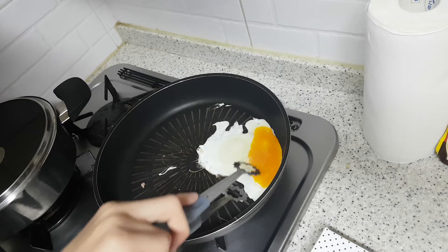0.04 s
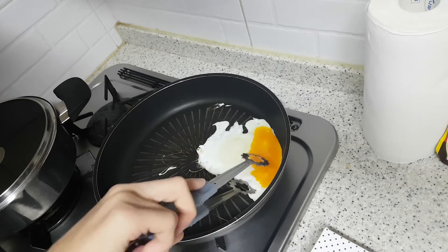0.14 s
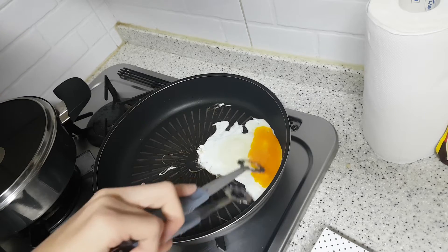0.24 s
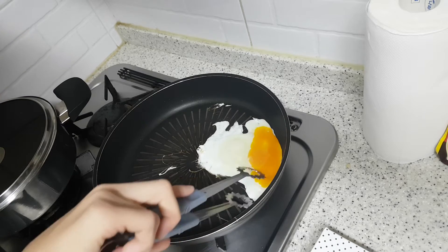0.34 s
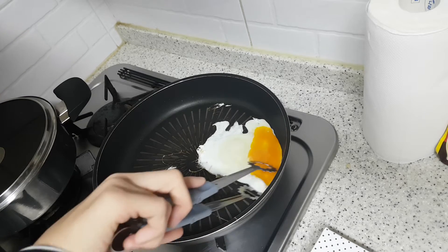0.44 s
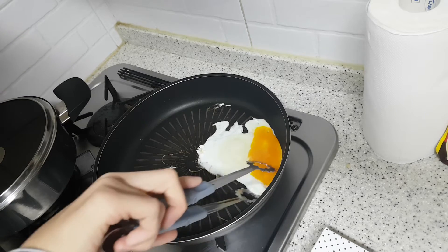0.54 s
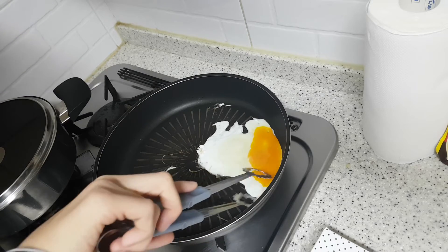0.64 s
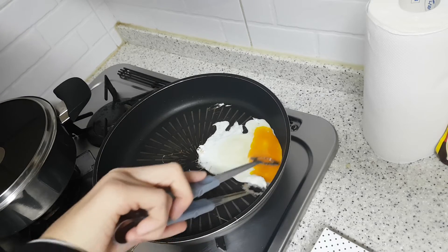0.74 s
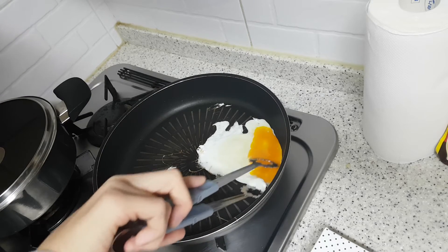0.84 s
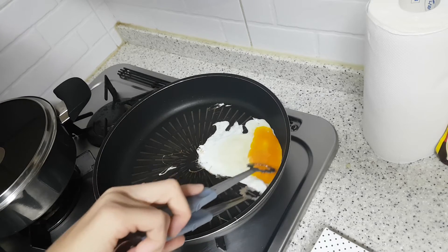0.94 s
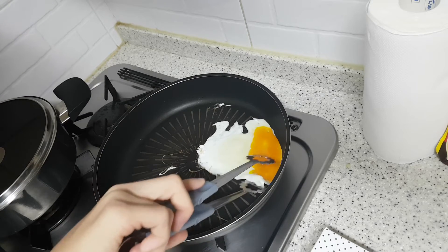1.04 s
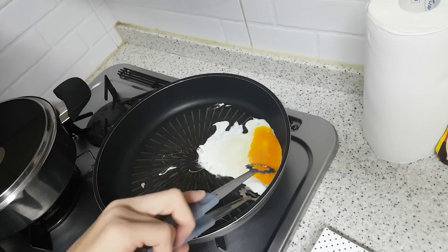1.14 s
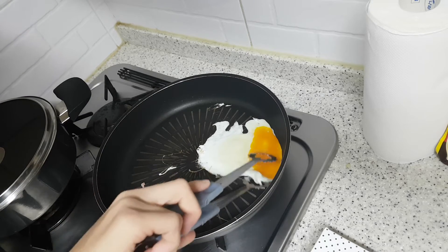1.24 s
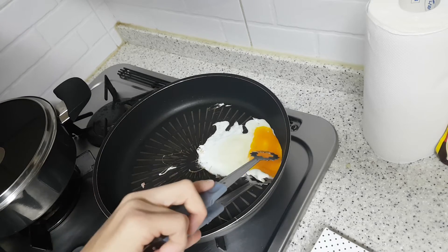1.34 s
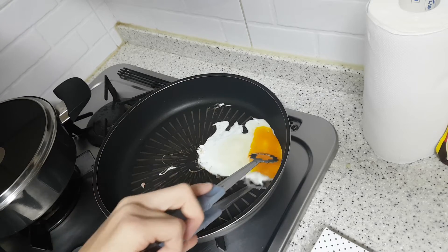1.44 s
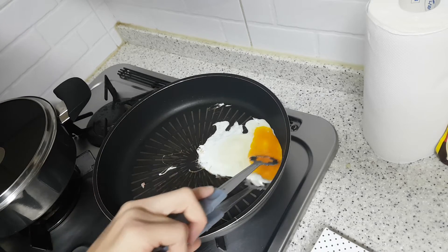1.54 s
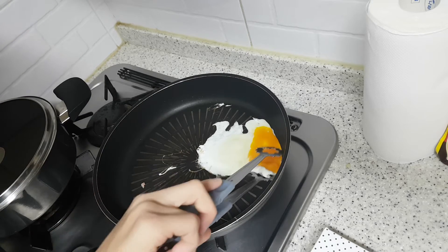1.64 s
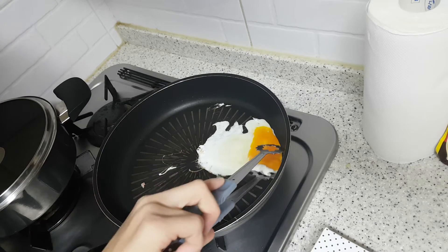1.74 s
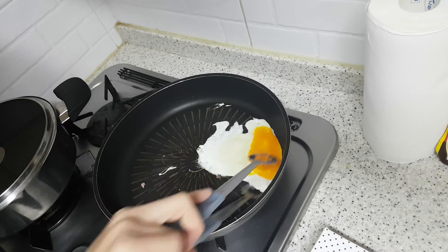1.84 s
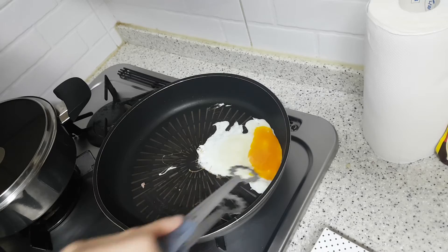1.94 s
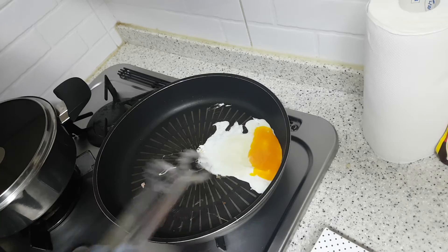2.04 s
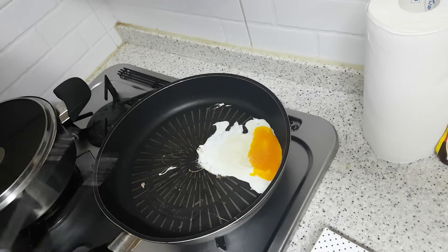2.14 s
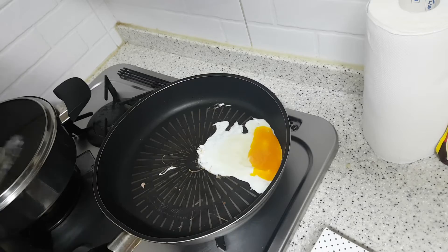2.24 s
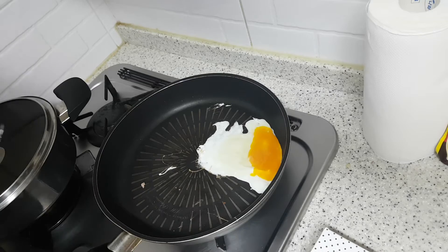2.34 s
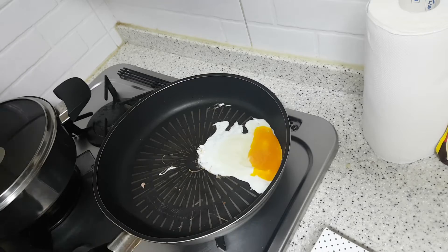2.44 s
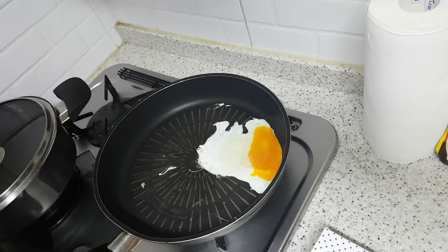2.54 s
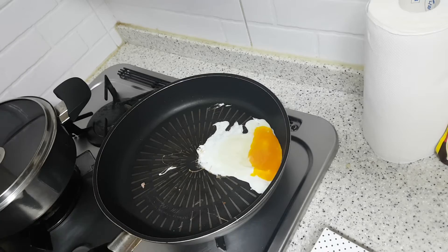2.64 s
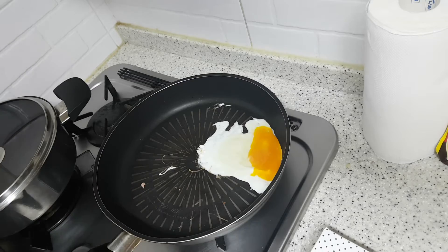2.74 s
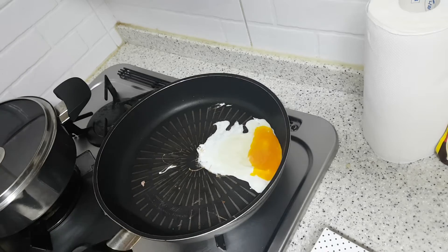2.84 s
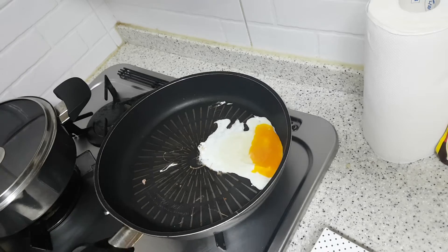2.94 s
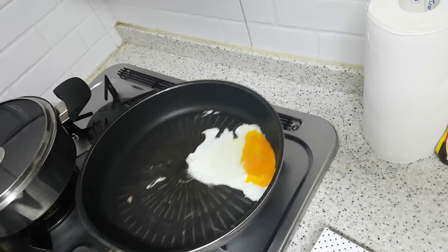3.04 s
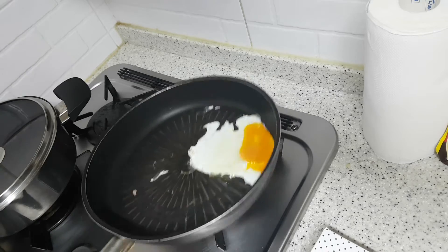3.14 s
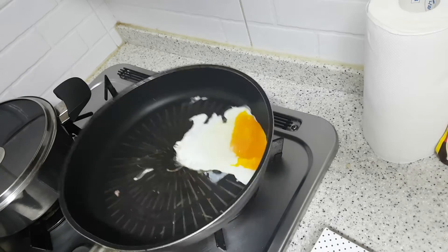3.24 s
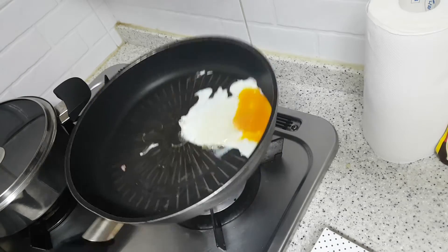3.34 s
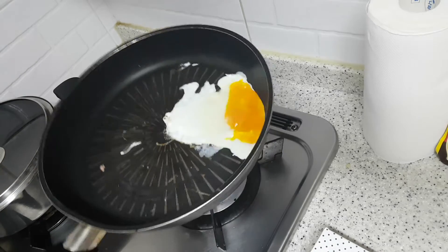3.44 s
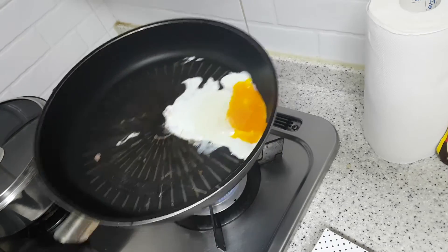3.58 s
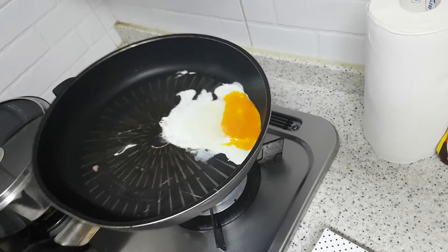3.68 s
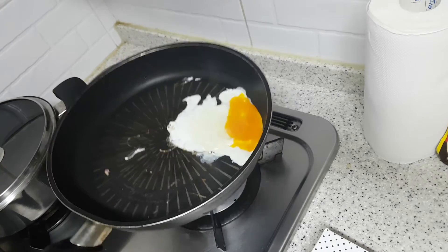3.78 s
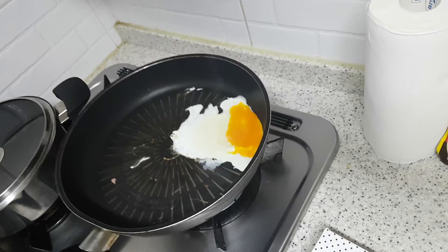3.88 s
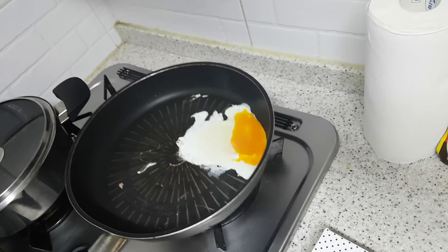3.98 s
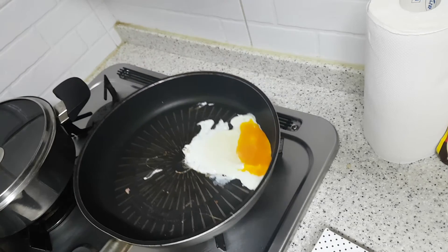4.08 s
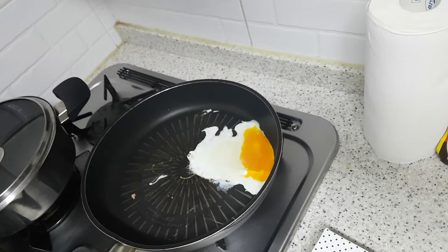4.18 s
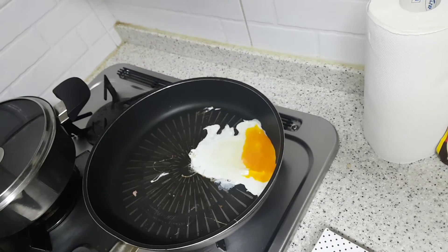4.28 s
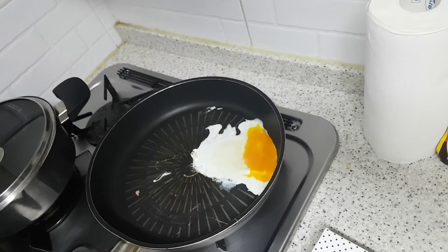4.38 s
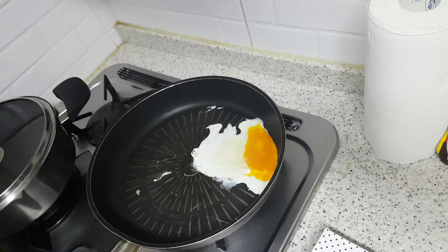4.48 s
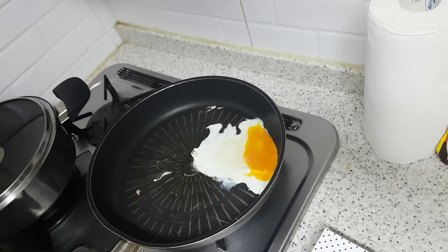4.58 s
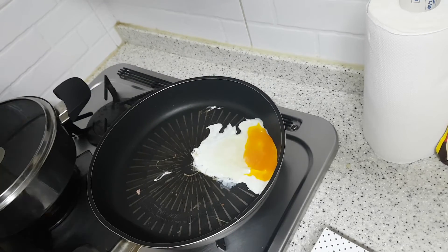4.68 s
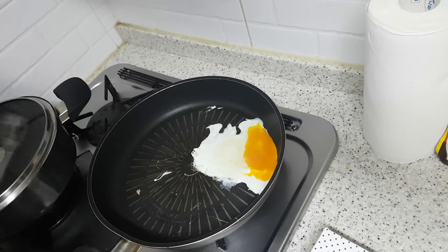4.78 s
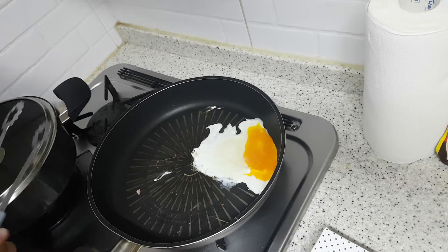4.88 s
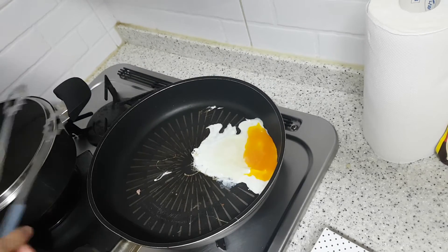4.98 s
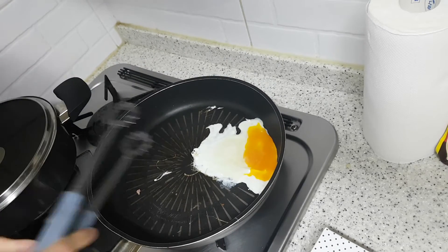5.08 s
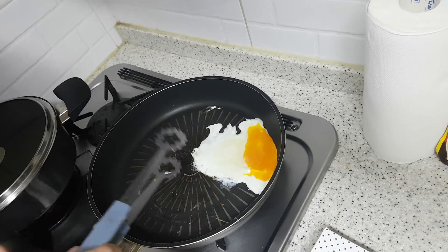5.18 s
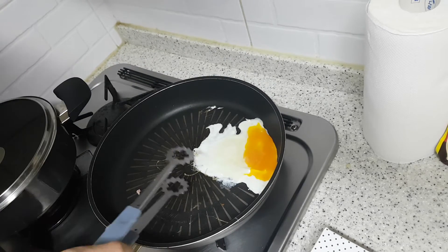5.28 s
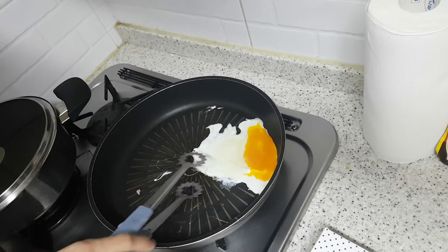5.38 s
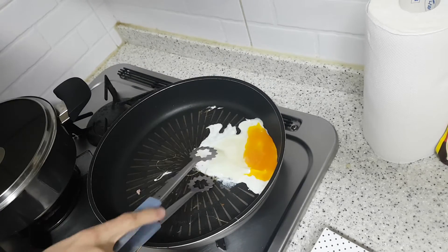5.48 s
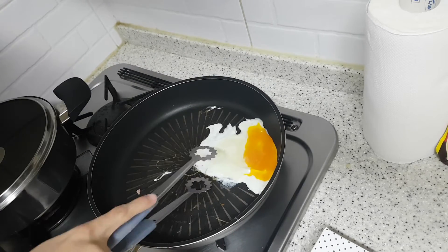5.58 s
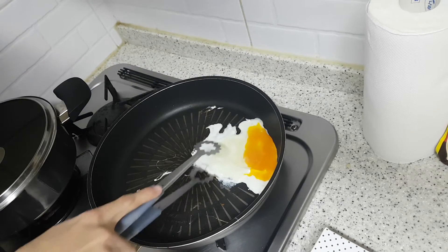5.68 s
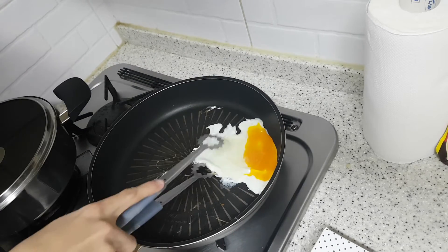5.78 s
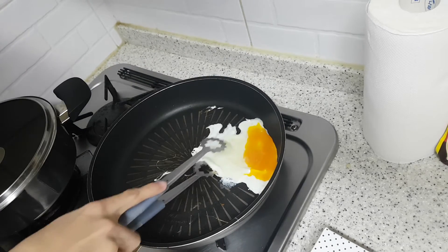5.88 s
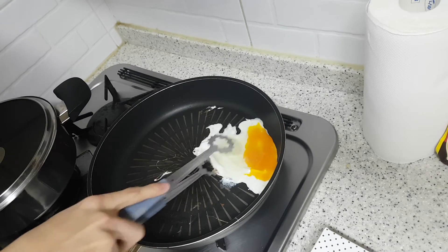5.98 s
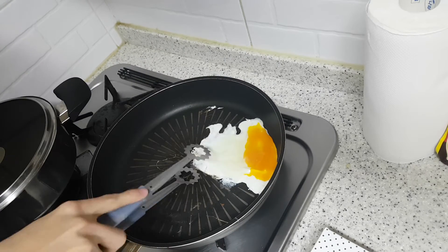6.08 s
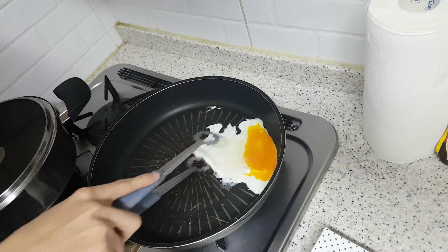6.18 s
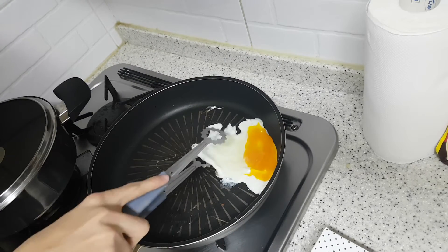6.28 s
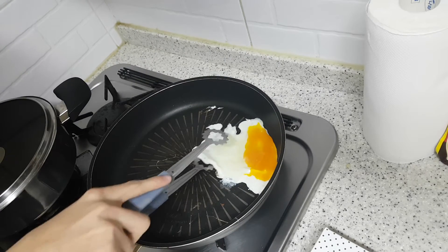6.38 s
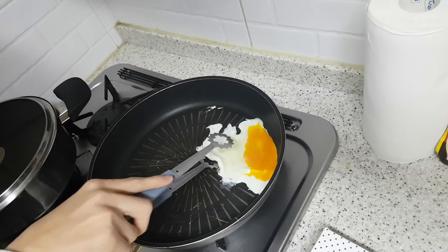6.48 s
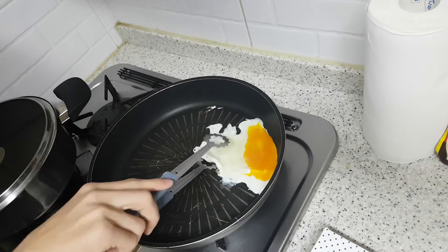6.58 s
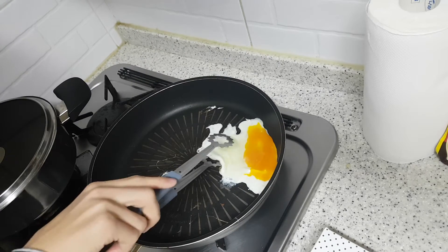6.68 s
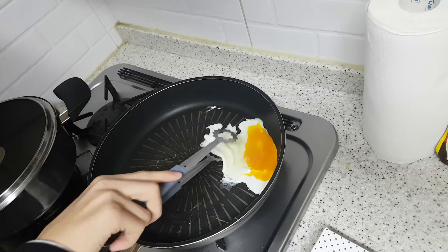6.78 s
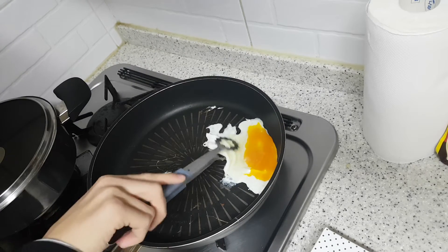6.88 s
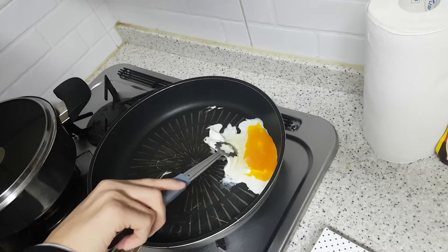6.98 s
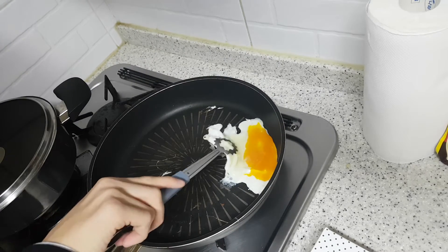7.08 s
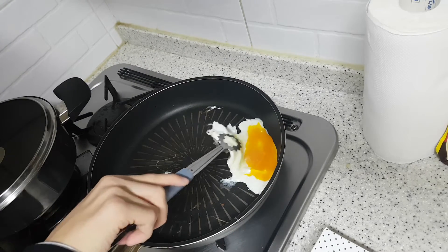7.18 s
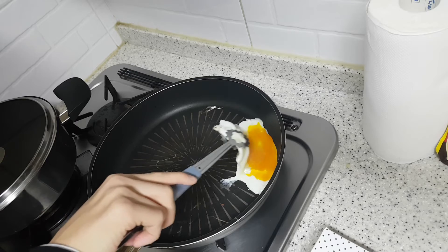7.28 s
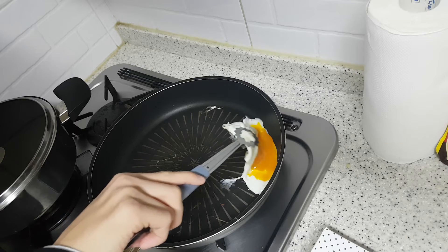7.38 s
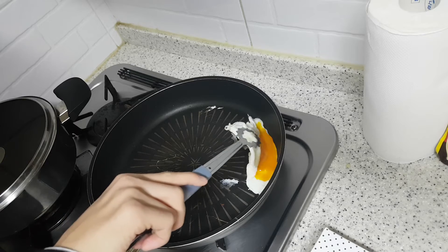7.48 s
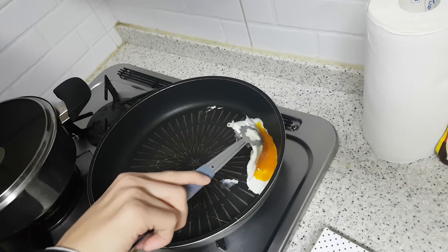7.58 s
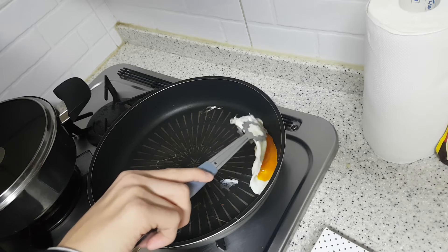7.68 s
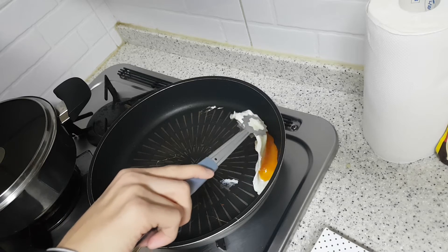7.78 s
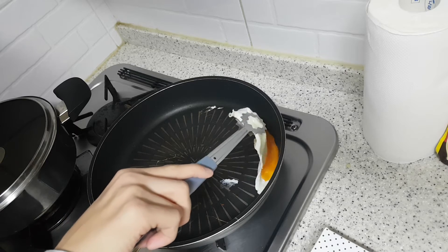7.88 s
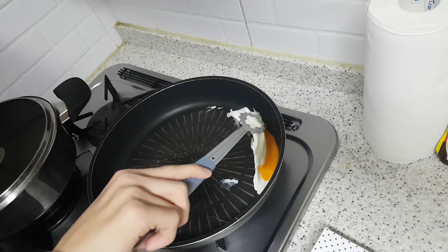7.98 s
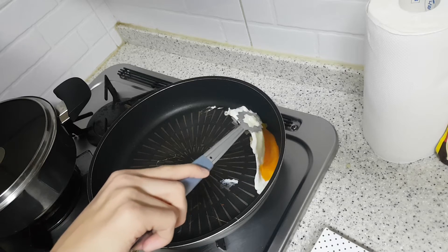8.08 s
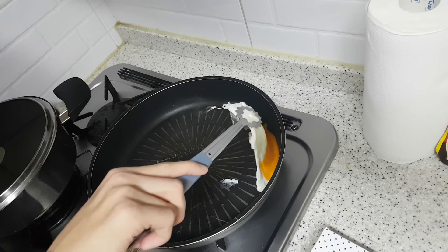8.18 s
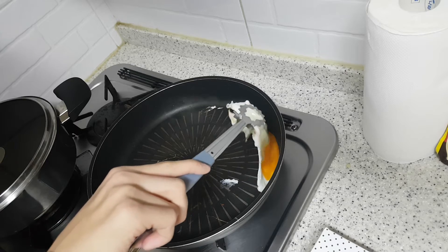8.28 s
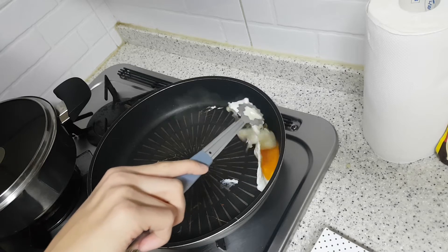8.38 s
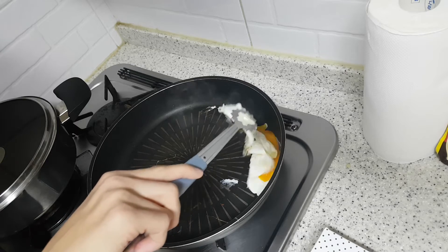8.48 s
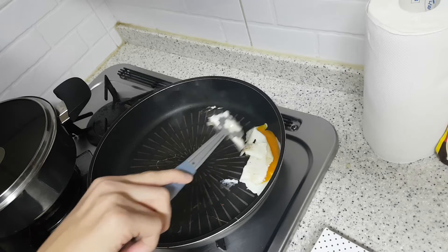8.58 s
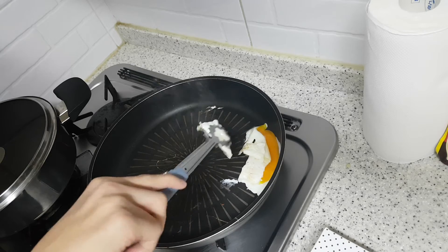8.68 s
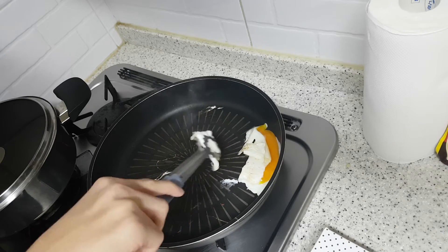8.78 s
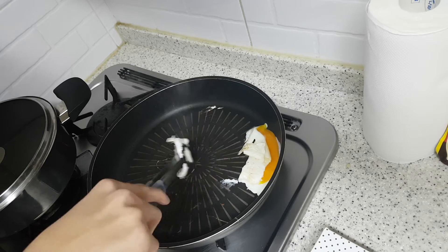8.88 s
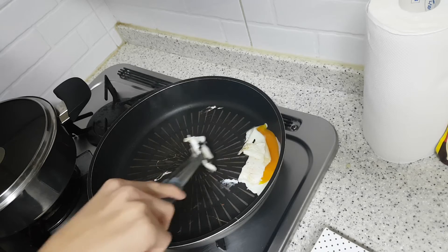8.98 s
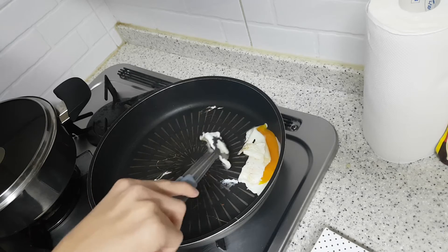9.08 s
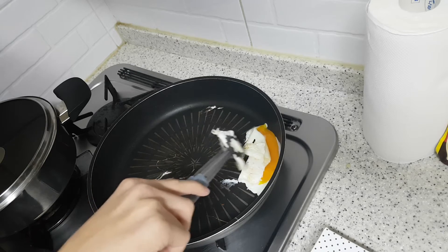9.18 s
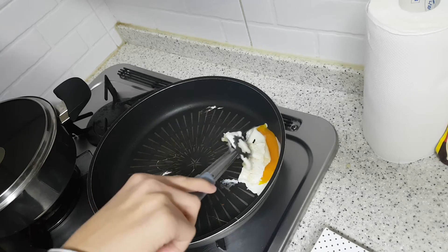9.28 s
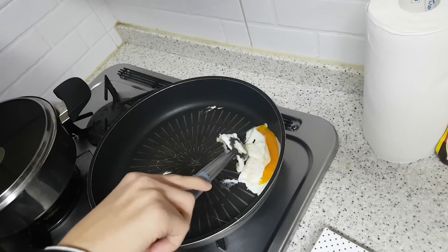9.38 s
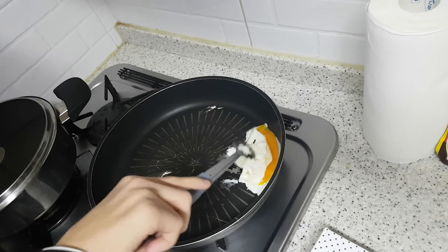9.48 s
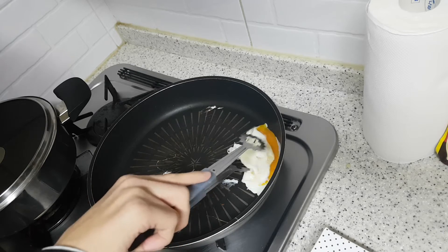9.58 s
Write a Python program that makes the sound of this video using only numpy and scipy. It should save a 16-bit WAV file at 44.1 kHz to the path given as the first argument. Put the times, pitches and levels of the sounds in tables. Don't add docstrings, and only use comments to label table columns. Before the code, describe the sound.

An egg fries gently close to the microphone, with thin fizz and sharp little spits of fat. Tongs tap and scrape the pan floor, then the pan scrapes off its iron trivet at three seconds and returns after four with three bright clanks and a low stove rumble. More tong scraping follows, then mostly crackling. Small tiled kitchen, faint motor hum.

```python
import sys
import numpy as np
from scipy import signal
from scipy.fft import rfft, irfft, next_fast_len
from scipy.io import wavfile
from scipy.ndimage import uniform_filter1d

SR = 44100
rng = np.random.default_rng(int(sys.argv[2]) if len(sys.argv) > 2 else 0)


def gain_from_decibels(decibels):
    exponent = np.asarray(decibels, float) / 20
    return 10 ** exponent


def to_wav(s):
    ch = np.atleast_2d(s).T
    pcm = np.round(np.clip(ch, -1, 1) * 32767)
    wavfile.write(sys.argv[1], SR, pcm.astype(np.int16))


N = 424683
PAN_MOVES = slice(round(2.8 * SR), round(5 * SR))

# time in seconds, fizz level in dB.
FRY = [(0.0, -55), (0.27, -53), (2.17, -51.5), (2.68, -54.5), (3.16, -48.5), (3.62, -55), (4.21, -57),
       (4.56, -55.5), (5.07, -58), (5.58, -60), (5.95, -52), (7.59, -52.5), (8.2, -61.5), (8.53, -63),
       (8.85, -57.5), (9.33, -59), (9.63, -56.5)]
# pitch in Hz, level in dB, 60 dB decay in seconds.
STOVE = [(74.87, -3.5, 0.3), (121.8, 1.5, 0.45), (198.4, 6, 0.37), (257, 4, 0.21), (285.6, -7, 0.42),
         (360.7, 5.5, 0.27), (513, 1.5, 0.2), (700, -4, 0.11)]
# pitch in Hz, level in dB, 60 dB decay in seconds.
PINCHED = [(90, -11, .12), (890, -16, 0.09), (1340, -4, 0.05), (1930, 6, 0.036), (2540, -3, 0.046),
           (3112, -12, 0.046), (4420, 3, 0.03), (5250, -12, .03)]
TAPPED = [(528, -11, 0.22), (1203, 0, 0.084), (1485, -8, 0.14), (1930, -3, .09), (2450, 0, 0.1),
          (2650, -3, 0.18), (3020, 5, .045), (3400, 1, .05), (4177, -7, 0.22), (4603, 0, .05),
          (5250, 0, 0.076)]
OPEN = [(520, -14, 0.41), (793, -10.5, .15), (1250, 0, .08), (1380, -2, 0.086), (1480, -3, 0.19),
        (1583, -2, 0.14), (2035, -14, 0.84), (2420, -2, 0.11), (2659, -8, .1), (3150, -12, .12),
        (4177, 2.5, 0.16), (4700, -3, .09), (256, -12, .13), (5300, -2, .05)]
DROPPED = [(150, -16, 0.13), (525, -14.5, 0.2), (890, -8, 0.16), (940, -4, 0.16), (1275, 7, 0.053),
           (1320, -7, 0.1), (1520, -10, .2), (1716, 2, 0.065), (2060, 0, .05), (2560, 1.5, 0.086),
           (4150, -14, .05), (4650, -8, .12), (5300, -5, .08), (6250, -11, .05)]
# pitch in Hz, level in dB, 60 dB decay in seconds.
LEAVING = [(520, -5, 0.2), (900, -9, 0.18), (1310, -6, 0.26), (1475, -6, 0.22), (2007, -9, .1),
           (2090, 4, 0.046), (2420, -9, .1), (3330, -10, .1), (4500, -7, 0.12), (4620, -1, 0.12),
           (5220, -6, .15), (5320, -7, 0.15), (6400, -12, .12)]
FIRST_PRONG = [(649, -2, 0.24), (954, -6.5, 0.26), (1126, -1.5, 0.19), (1331, -3, .17), (1765, 1, 0.15),
               (1957, 6.5, 0.084), (2085, 6.5, 0.091), (2580, 1, 0.078), (2770, 2.5, 0.087),
               (3470, -5, 0.11), (4430, -14, 0.14), (4640, -4, .13), (4920, -28, 0.064), (5566, -26, 0.073)]
SECOND_PRONG = [(889, -15, .2), (950, -6, 0.14), (1600, -4, 0.084), (2020, 4, .07), (2400, -5, 0.14),
                (2730, -4.5, 0.16), (3290, -5, 0.05), (4120, -12, 0.055), (4740, -16, 0.15),
                (5039, -8, 0.055), (5500, -8, 0.049)]
THIRD_PRONG = [(668, -18, 0.12), (1076, -10, .1), (1373, 1.5, 0.061), (1920, -7.5, 0.18), (2010, -10, .2),
               (2360, -14, 0.14), (2659, -6, .15), (3320, -2.5, .08), (4080, -7, 0.18), (4177, -17, 0.13),
               (4410, -6, 0.09), (4810, -8, 0.15), (5416, -13, 0.12), (5620, -9, 0.057)]


def rms_one(x):
    return x / np.sqrt(np.mean(x ** 2) + 1e-20)


def in_time(rows):
    s, *columns = np.transpose(rows)
    return [np.interp(np.arange(N) / SR, s, column) for column in columns]


def at_hz(points, hz):
    point_hz, point_level = np.transpose(points)
    return np.interp(np.log(hz + 1), np.log(point_hz), point_level)


def coloured(x, spectrum):
    size = next_fast_len(N)
    hz = np.arange(size // 2 + 1) * SR / size
    shaped = rfft(x, size) * gain_from_decibels(at_hz(spectrum, hz))
    return rms_one(irfft(shaped, size)[..., :N])


def band(x, low_hz, high_hz):
    sos = signal.butter(2, [low_hz, min(high_hz, .45 * SR)], "band", fs=SR, output="sos")
    return signal.sosfilt(sos, x + 1e-18)


def drift(rate):
    r = np.exp(-80 * np.pi * rate / SR)
    slow = signal.lfilter([1], [1, -2 * r, r * r], rng.standard_normal(N // 40 + 2002))[2000:]
    return np.interp(np.arange(N) / 40, np.arange(len(slow)), rms_one(slow))


def ring(clicks, hz, t60):
    r, w = gain_from_decibels(-60 / (t60 * SR)), 2 * np.pi * hz / SR
    return signal.lfilter([0, np.sin(w)], [1, -2 * r * np.cos(w), r * r], clicks + 1e-18)


def clicks_at(times, db):
    train = np.zeros(N)
    at = np.minimum(np.round(np.asarray(times) * SR).astype(int), N - 1)
    np.add.at(train, at, gain_from_decibels(db))
    return train


def dying(train, t60):
    return signal.lfilter([1], [1, -gain_from_decibels(-60 / (t60 * SR))], train + 1e-18)


def grains(per_s, spread_db):
    sizes = gain_from_decibels(spread_db * np.minimum(rng.exponential(1, N), 5)) * rng.choice([-1, 1], N)
    return sizes * (rng.random(N) < per_s / SR)


def swells(rows, depth_db):
    t, out = np.arange(N) / SR, np.zeros(N)
    for s, db, rise, fall in rows:
        during = slice(max(round((s - rise) * SR), 0), round((s + fall) * SR))
        shape_db = np.interp(t[during], [s - rise, s, s + fall], [-depth_db, 0, -depth_db])
        out[during] += gain_from_decibels(db + shape_db)
    return uniform_filter1d(out, size=130)


def ringing(s, db, rise, modes):
    out, t = np.zeros(N + SR), np.arange(SR // 2) / SR
    phase = rng.random(14)
    sines = sum(gain_from_decibels(mode_db - 60 * t / t60) * np.sin(2 * np.pi * (hz * t + p))
                for (hz, mode_db, t60), p in zip(modes, phase))
    out[round(s * SR):][:len(t)] = gain_from_decibels(db) * np.minimum(t / max(rise, 1e-4), 1) * sines
    return out[:N]


def struck(s, db, modes, level_db):
    luck = 2 * rng.standard_normal((len(s), len(modes)))
    out = 0
    for k, (hz, mode_db, t60) in enumerate(modes):
        blows = clicks_at(s, db + level_db + mode_db + luck[:, k])
        out = out + ring(blows[PAN_MOVES], hz, t60)
    return out


def pair(make):
    # pitch in Hz, left-right likeness from 0 to 1.
    likeness = [(60, 0.97), (180, 0.84), (550, 0.68), (1650, 0.088), (4970, 0.017), (15000, 0.0)]
    size = next_fast_len(N)
    alike = np.clip(at_hz(likeness, np.arange(size // 2 + 1) * SR / size), -1, 1)
    mid = np.sqrt(1 + alike) * rfft(make(), size)
    side = np.sqrt(1 - alike) * rfft(make(), size)
    return irfft(np.array([mid + side, mid - side]), size)[:, :N] / np.sqrt(2)


def frying():
    # pitch in # Hz, level in dB per Hz.
    fizz_colour = [(1470, -8.5), (2500, 0.5), (2660, -15), (2880, -2.5), (3920, -4.5), (4580, -4),
                   (6150, -10.5), (8100, -5.5), (8750, 0), (9440, -7), (12700, -6), (15200, -4.5),
                   (15850, 0), (16050, -70)]
    simmer_colour = [(210, -7), (350, -6), (577, -7), (917, -5), (1030, -5), (1260, 0.5), (1680, -3.5),
                     (2550, -2), (2770, -4.5), (6000, -10.5), (7800, -14.5), (13200, -120)]
    # peak in seconds, level in dB, build-up and die-away in seconds.
    jolts = [
        (0.66, -52.5, 0.26, 0.28),
        (2.66, -57, 0.53, 0.34),
        (6.08, -60, 0.85, 0.74),
        (4.41, -42.5, 0.11, 0.24),
        (6.8, -56, 0.32, 0.16),
        (7.87, -55, 0.018, 0.024),
        (8.75, -57.5, 0.17, 0.16),
    ]
    fizz_db, = in_time(FRY)
    middle_db = fizz_db.mean()
    setting_db = -0.7027 * np.arange(N) / SR
    simmer_db = middle_db + 0.92 * (fizz_db - middle_db) + 2.5 + setting_db
    gust = 1.4 * drift(11) + 1.9 * drift(35)
    fizz = coloured(pair(lambda: grains(9000, 1.2)) * gain_from_decibels(gust), fizz_colour)
    simmer = coloured(pair(lambda: grains(2500, 1.0)) * gain_from_decibels(0.81 * gust + 1.6 * drift(32)), simmer_colour)
    simmer *= gain_from_decibels(simmer_db) + swells(jolts, depth_db=18.5)
    fizz_gain = gain_from_decibels(fizz_db + 2.0 + np.array([[-.3], [.3]]))
    simmer_gain = gain_from_decibels(3.5 + np.array([[-.6], [.6]]))
    return fizz_gain * fizz + simmer_gain * simmer


def spits():
    # time in seconds, peak in dB.
    wet_spits = [(0.042, -22), (0.1883, -19.5), (0.6704, -35), (1.074, -25), (1.313, -30), (1.897, -28.5),
                 (2.277, -27.5), (4.0382, -28.5), (5.387, -21), (5.748, -27.5), (6.567, -25.5),
                 (6.719, -32), (6.87, -23.5), (7.197, -25.5), (7.284, -28.5), (7.368, -27.5),
                 (7.4776, -22.5), (7.72, -21), (7.791, -23.5), (8.744, -32), (8.814, -34), (8.904, -25.5),
                 (9.0383, -26), (9.172, -25), (9.3619, -29), (9.468, -34)]
    dry_pops = [(1.151, -26.5), (1.351, -26.5), (1.632, -25.5), (1.723, -25), (1.96, -39), (2.714, -33),
                (3.1632, -32), (3.319, -33), (3.832, -30), (4.157, -29.5), (4.6795, -32.5), (4.987, -25.5),
                (5.7654, -28.5), (5.822, -21), (5.891, -25.5), (6.338, -23.5), (6.915, -31), (7.3073, -24),
                (7.422, -27.5), (7.9304, -31), (7.997, -37), (8.165, -34), (8.235, -37), (8.45, -39),
                (8.53, -33.5), (8.58, -33), (8.855, -33), (8.9526, -33)]
    # time in seconds, peak in dB, body against the crack in dB.
    ticks = [(0.3862, -21, -6.5), (0.568, -32.5, 8), (0.7333, -35, 0), (0.827, -27.5, -6),
             (2.0243, -49, -12), (2.601, -24.5, -6), (3.0087, -16, 2), (2.355, -30.5, 1.5),
             (3.4121, -13.5, -12.5), (3.4135, -25, -12.5), (5.9362, -22.5, -9), (5.8032, -33, 0),
             (4.1417, -40, 5.5), (4.2445, -18, 1), (4.354, -24, 4), (4.4192, -14.5, 1), (5.079, -38.5, 3),
             (5.574, -33, -4), (5.684, -34, 1), (6.129, -28.5, -6), (6.7854, -44, 7), (9.5232, -38.5, 3.5),
             (9.5477, -18.5, -5)]
    wet = [(*row, -10.5) for row in wet_spits]
    dry_ones = [(*row, -32) for row in dry_pops]
    s, db, body_db = np.transpose(wet + dry_ones + ticks)
    fine_db = 2.5 * rng.standard_normal(len(s))
    spray = rms_one(grains(8000, 3.4))
    coarse, fine = clicks_at(s, db - fine_db), clicks_at(s, db + fine_db)
    body = clicks_at(s, db + body_db)
    top = band(gain_from_decibels(-1.0) * coarse + gain_from_decibels(-11.0) * dying(coarse, 0.034) * spray, 3740, 12500)
    top += gain_from_decibels(4) * band(fine, 9500, 17000)
    top += gain_from_decibels(-15.0) * band(gain_from_decibels(2.0) * dying(fine, 0.017) * spray, 10600, 15200)
    return top + band(gain_from_decibels(17.5) * body + gain_from_decibels(2.0) * dying(body, 0.04) * spray, 720, 5010)


def small_spits():
    dull = band(grains(40, 3.5), 1400, 7400)
    thin = band(grains(60, 3.5), 9100, 15000)
    return gain_from_decibels(in_time(FRY)[0]) * (gain_from_decibels(18.5) * dull + gain_from_decibels(14.0) * thin)


def taps():
    # time in seconds, peak in dB, pitch of the
    # contact in Hz.
    knocks = [(0.516, -36, 815), (0.671, -27, 1580), (0.881, -30, 1400), (0.924, -36.5, 740),
              (1.066, -34, 1330), (1.22, -29, 2480), (1.896, -32.5, 2600), (2.343, -33.5, 1150),
              (2.599, -32, 2460), (2.687, -31.5, 2460), (2.878, -31.5, 2160), (2.961, -28, 550),
              (3.199, -28, 900), (3.24, -24.5, 2380), (4.129, -32, 2400), (4.745, -34.5, 1680),
              (4.883, -32, 2370), (4.931, -32.5, 1530), (5.079, -30.5, 826), (5.453, -33.5, 2090),
              (5.685, -32, 4600), (2.012, -33, 2400), (6.06, -25, 1690), (6.337, -28.5, 3080),
              (6.864, -31.5, 890), (7.422, -35, 1810), (7.72, -32, 2620), (9.037, -37, 2320),
              (9.52, -34, 2480),
              (0.2808, -35, 4600), (0.631, -36, 1390), (1.049, -35, 1330), (1.5384, -37, 2560),
            (1.6598, -30, 2300), (1.9116, -30, 2970), (2.2996, -34, 2570), (2.3501, -41, 1110),
            (2.4227, -33, 3240), (2.464, -33, 2640), (2.5216, -34, 2340), (2.8388, -33, 2590),
            (2.907, -35, 1270), (3.1807, -28.5, 2540), (3.385, -38, 2300), (4.69, -44, 400),
            (3.8906, -35, 1150), (4.206, -40, 3000), (4.7736, -38, 2620), (5.1044, -35.5, 3200),
            (2.745, -37, 700), (6.8184, -39, 1110), (7.008, -33, 3720), (7.0543, -36.5, 2060),
            (7.8713, -37, 1600), (9.6105, -33, 1740)]
    out, rows = np.zeros(N), knocks
    t = np.arange(round(.06 * SR)) / SR
    contact = rng.standard_normal((len(rows), len(t))) * gain_from_decibels(-60 * t / 0.026)
    for (s, db, hz), kick in zip(rows, contact):
        at = round(s * SR)
        knock = ring(kick, hz, 0.006) + gain_from_decibels(16.5) * band(kick, 0.67 * hz, 1.63 * hz)
        out[at:at + len(kick)] += gain_from_decibels(db + 1.0) * (knock / np.abs(knock).max())[:N - at]
    return out


def scrape():
    # peak in seconds, friction in dB, build-up in seconds,
    # die-away in seconds, flexing of the whole pan against the friction in dB.
    drags = [(.24, -42, 0.22, 0.018, -21), (.42, -48, 0.026, 0.064, 5), (.555, -37, 0.13, 0.012, -15),
             (.605, -45.5, 0.016, 0.065, -4), (0.747, -34.5, 0.052, 0.13, -10),
             (1.072, -35.5, 0.032, 0.055, -21), (1.3, -42.5, 0.21, 0.16, -12),
             (2.063, -31, 0.033, 0.031, -9), (2.366, -42, 0.086, 0.011, -32), (5.5, -37, 0.042, 0.1, -7.5),
             (5.79, -34.5, .11, 0.086, -11), (6.136, -28.5, 0.057, 0.031, -24),
             (6.254, -29, 0.071, 0.098, -24), (6.5, -35, 0.066, .06, -13), (6.862, -47.5, 0.03, 0.14, -5),
             (9.565, -46, .01, .1, -16)]
    # time in seconds, peak in dB, brightness in dB per octave.
    jumps_over_ribs = [(0.045, -34, -2), (1.319, -36, -6), (5.483, -33.5, -10), (5.502, -43, -11),
                       (5.539, -29, -7), (5.685, -26.5, -9), (5.736, -31, -10), (5.773, -31.5, -9),
                       (5.801, -40, 7), (6.112, -21, 3.5), (6.126, -30, 10), (6.141, -25, 2.5),
                       (6.162, -29, -7), (6.222, -30, -11), (6.24, -29, 2), (6.264, -30, -9),
                       (6.29, -32, -7), (6.318, -41, -8), (6.489, -45, 5), (6.866, -29, -7),
                       (9.57, -33, -11)]
    # pitch in Hz, width in Hz, level in dB.
    pan_floor = [(528, 35, -13), (670, 50, -9), (790, 50, -5), (880, 50, -2), (945, 50, -7), (1310, 50, -2),
                 (1385, 50, 1), (1760, 50, 1), (1900, 60, -2), (2560, 50, 4), (2660, 55, -2),
                 (4650, 200, -8), (5300, 200, -9), (6350, 150, -13)]
    slips = rms_one(grains(2500, 2.5) * gain_from_decibels(2.0 * drift(60)))
    drag = swells([row[:4] for row in drags], depth_db=15.0) * slips
    flexing = swells([(s, db + flex_db, rise, fall) for s, db, rise, fall, flex_db in drags], depth_db=5.5)
    s, db, tilt_db = np.transpose(jumps_over_ribs)
    sound = gain_from_decibels(-3) * band(drag, 600, 3200)
    for k, (hz, width, mode_db) in enumerate(pan_floor):
        octaves = np.log2(hz / 1400)
        jumps = dying(clicks_at(s, db + np.clip(tilt_db, -5, 6) * octaves), 0.034) * slips
        force = gain_from_decibels(-34.5 - 3.5 * octaves) * drag + gain_from_decibels(-28.5) * jumps
        sound += gain_from_decibels(mode_db) * (-1) ** k * ring(force, hz, 1.9 / width)
    return sound + gain_from_decibels(-6.5) * flexing * rms_one(ring(slips, hz=262, t60=0.15))


def clacks():
    # time in seconds, peak in dB, rise in seconds, crack against the ring in dB, blade modes.
    blade_hits = [
        (0.3855, -30.5, 0.00088, -2, PINCHED),
        (0.3993, -39, .001, -2, PINCHED),
        (0.5651, -29, .001, 2, TAPPED),
        (0.7334, -35.5, .001, 2, PINCHED),
        (2.0206, -29, 0.0042, 7.5, OPEN),
        (9.5465, -28.5, 0.0012, 3, DROPPED),
    ]
    s, db, crack_db = np.transpose([(s + rise, db, crack_db) for s, db, rise, crack_db, modes in blade_hits])
    burst = dying(clicks_at(s, db + crack_db + 4.5), .035) * rng.standard_normal(N)
    crack = band(burst, 1000, 4500)
    return crack + sum(ringing(s, db, rise, modes) for s, db, rise, crack_db, modes in blade_hits)


def pan_rings():
    # time in seconds, peak in dB, rise in seconds, pan modes.
    rings = [
        (3.0078, -23, 0.0011, LEAVING),
        (3.0688, -40, .001, FIRST_PRONG),
        (4.2432, -23, 0.00087, FIRST_PRONG),
        (4.2598, -23, 0.00081, THIRD_PRONG),
        (4.3535, -19.5, 0.0011, SECOND_PRONG),
        (4.393, -30, .001, SECOND_PRONG),
        (4.4178, -19.5, 0.00092, THIRD_PRONG),
        (4.462, -35, .003, FIRST_PRONG),
    ]
    return gain_from_decibels(3.0 * drift(79)) * sum(ringing(*row) for row in rings)


def clanks():
    # time in seconds, peak in dB, thud in dB, top in dB,
    # upper prong modes against lower in dB.
    hits = [(2.952, -34, -60, -62, -8), (2.98, -34, -60, -63, -9), (3.023, -17.5, -47, -57, -14),
            (3.054, -22.5, -50, -56, -5), (4.273, -17.5, -50, -47, -6), (4.287, -23, -50, -52, -15),
            (4.303, -26, -50, -52, -11), (4.322, -27, -50, -54, -10), (4.368, -19, -50, -56, -10),
            (4.379, -27, -50, -52, -11), (4.404, -30, -50, -60, -11), (4.431, -26, -52, -52, -8),
            (4.48, -26, -46, -55, -8), (3.0072, -16.5, -27.5, -29.5, 4.5), (3.038, -27, -28, -64, -9),
            (3.075, -27, -28, -63, -11), (4.243, -8.5, -30, -25, -11), (4.261, -11.5, -20, -39, 3),
            (4.3541, -10.5, -36, -34.5, -5), (4.392, -26, -23.5, -58, -23),
            (4.418, -11.5, -22.5, -22.5, -4), (4.462, -17, -43, -54, -18)]
    # pitch in Hz, level in dB, 60 dB decay in seconds.
    low_prongs = [(936, -9.5, 0.13), (1110, -34, 0.044), (1390, -12, 0.057), (1580, 5.5, 0.01),
                  (2040, -2, 0.0094), (2090, -4.5, 0.012), (2464, 1, 0.018), (3280, -9, 0.02)]
    middle_prongs = [(4060, -5, .05), (4150, -4, .05), (4380, -4, .05), (4450, -2, .07), (4565, -2, .08),
                     (4650, -4, .06), (4730, -5, .06), (4850, -4, .05)]
    upper_prongs = [(5180, -4, .05), (5260, -3, .06), (5340, -1, .09), (5450, -7, .04), (5620, -3, .04),
                    (7200, -13, .015), (8700, -10, .012)]
    s, db, thud_db, top_db, upper_db = np.transpose(hits)
    rattle = rms_one(grains(7000, 2.1))

    def chatter(level_db, t60):
        return (dying(clicks_at(s, level_db), t60) * rattle)[PAN_MOVES]

    blows, bright = chatter(db, .07), chatter(top_db, .14)
    upper = chatter(top_db + upper_db, .14)
    driven = ((blows, low_prongs, -34), (bright, middle_prongs, -22), (upper, upper_prongs, -22))
    prongs = sum(gain_from_decibels(level_db + mode_db) * ring(force, hz, t60)
                 for force, modes, level_db in driven for hz, mode_db, t60 in modes)
    crash = band(blows, 254, 2560) + gain_from_decibels(1.0) * band(bright, 8600, 9000)
    crash += gain_from_decibels(-7.0) * band(bright, 6800, 7400) + gain_from_decibels(-24.0) * band(bright, 9800, 15500)
    crash += gain_from_decibels(3.5) * band(chatter(db, 0.01), 800, 3000)
    return prongs + crash + struck(s, thud_db, STOVE, level_db=-10.0)


def bumps():
    # time in seconds, level in dB.
    soft_hits = [(2.959, -24), (2.974, -20.5), (3.018, -27), (3.053, -30), (3.07, -18.5), (3.085, -26),
                 (4.275, -19), (4.287, -32), (4.316, -30), (4.439, -25)]
    s, db = np.transpose(soft_hits)
    damped = [(hz, mode_db, 0.22 * t60) for hz, mode_db, t60 in STOVE[1:]]
    return struck(s, db, damped, level_db=-12.0)


def rumble():
    # peak in seconds, rumble in dB, build-up in seconds, die-away in seconds.
    shakes = [
        (2.965, -28.5, 0.03, 0.2),
        (3.03, -35, .04, 0.14),
        (3.085, -28.5, .05, 0.42),
        (3.966, -45.5, 0.095, .08),
        (4.262, -20, 0.016, 0.32),
        (4.425, -22, 0.02, 0.28),
        (2.925, -36, 0.1, .1),
    ]
    drag = (grains(1500, 1.5) * gain_from_decibels(1.5 * drift(25)))[PAN_MOVES]
    shaken = sum(gain_from_decibels(db) * ring(drag, hz, 0.16 * t60) for hz, db, t60 in STOVE)
    return gain_from_decibels(-3.5) * swells(shakes, depth_db=33.5)[PAN_MOVES] * rms_one(shaken)


def kitchen_air():
    # pitch in Hz, level in dB per Hz.
    air_colour = [(13, -22.5), (22, -14), (85, -6), (134, -10.5), (270, -9), (312, -14.5), (512, -11),
                  (567, -19.5), (821, -15.5), (1010, -34.5), (1950, -26), (2250, -37), (3000, -46),
                  (3900, -67), (6600, -120)]
    # pitch in Hz, rms level in dB.
    motors = [(42, -64), (77.5, -70.5), (81.5, -68)]
    t, hum = np.arange(N) / SR, 0
    for hz, db in motors:
        level = np.sqrt(2) * gain_from_decibels(db + 0.63 * drift(3.4))
        hum = hum + level * np.sin(2 * np.pi * (hz * t + rng.random()))
    return gain_from_decibels(-58.5) * coloured(pair(lambda: rng.standard_normal(N)), air_colour) + hum


def space(x, near_db, room_db):
    near_t60_s, room_t60_s = 0.041, 0.24
    t = np.arange(round(.5 * SR)) / SR
    noise = rng.standard_normal((2, len(t)))
    mid, side = signal.lfilter(*signal.butter(2, 350, "high", fs=SR), noise)
    side = signal.lfilter(*signal.butter(1, 700, "high", fs=SR), side) * gain_from_decibels(4.0)
    shape = gain_from_decibels(near_db - 60 * t / near_t60_s) * (t > .001)
    shape += gain_from_decibels(room_db - 60 * t / room_t60_s) * (t > .006)
    low_pass = signal.cheby2(10, 50, 16100, fs=SR, output="sos")
    echoes = signal.sosfilt(low_pass, np.array([mid + side, mid - side]) * shape)
    return x + signal.fftconvolve(x * np.ones((2, 1)), echoes, axes=1)[:, :N]


def scene():
    tongs = clacks()
    metal = taps() + scrape() + .5 * tongs + pan_rings()
    metal[PAN_MOVES] += band(clanks() + rumble() + bumps(), 45, 16000)
    shadowed = metal - 0.31 * band(metal, 750, 8700)
    metal = np.array([shadowed, np.roll(metal, 5)])
    metal[:, PAN_MOVES] += gain_from_decibels(-19.5) * rumble() * [[1], [-1]]
    fat = space(spits() + small_spits(), near_db=-26.5, room_db=-36.5)
    metal = space(metal, near_db=-27.0, room_db=-41.5)
    direct_tongs = gain_from_decibels(np.array([[-8.0], [-5.0]])) * np.array([tongs, np.roll(tongs, 5)])
    return frying() + fat + metal + kitchen_air() + direct_tongs


def top_cut(x):
    return signal.sosfilt(signal.butter(12, 16960, fs=SR, output="sos"), x)


def record(dry):
    x = signal.sosfilt(signal.butter(6, 37, "high", fs=SR, output="sos"), dry)
    x = .95 * np.tanh(x / .95)
    x = signal.sosfilt(signal.cheby2(10, 50, 16950, fs=SR, output="sos"), x)
    body = signal.sosfiltfilt(signal.cheby2(8, 30, 16050, fs=SR, output="sos"), x)
    edge = x - body
    power = uniform_filter1d(np.sum(edge ** 2, axis=0), size=256)
    mix = body + edge * uniform_filter1d(1. * (power > 3e-6), size=128)
    return top_cut(mix)


dry = scene()
out = record(dry)
to_wav(out)
```